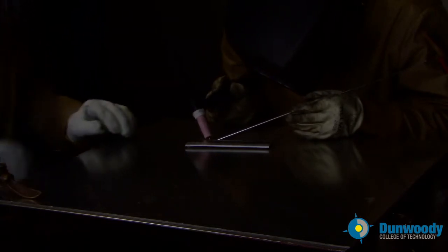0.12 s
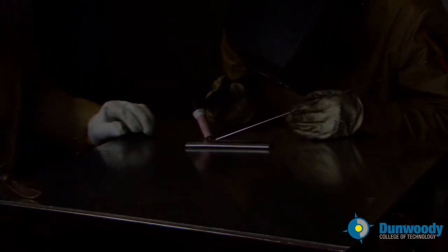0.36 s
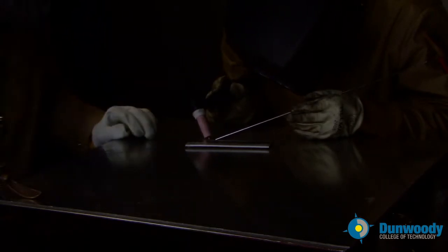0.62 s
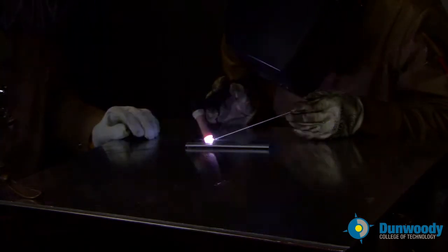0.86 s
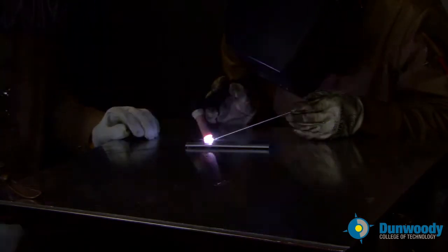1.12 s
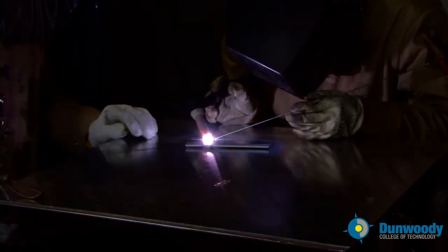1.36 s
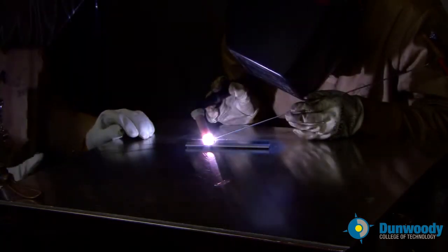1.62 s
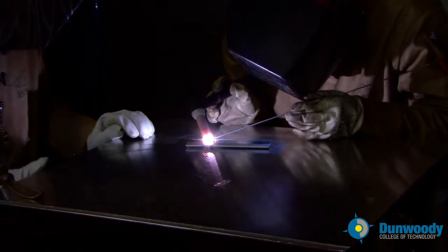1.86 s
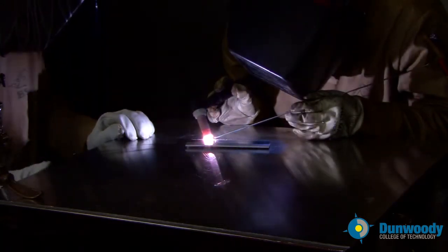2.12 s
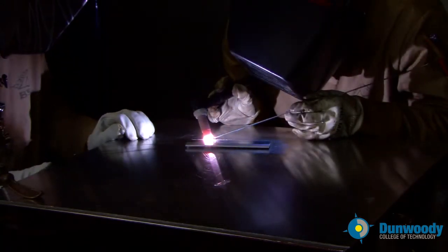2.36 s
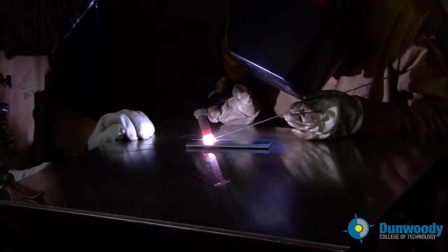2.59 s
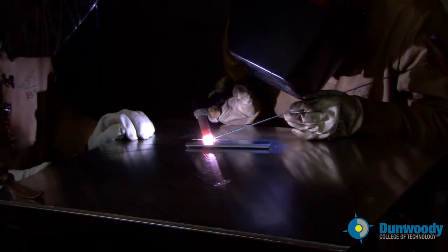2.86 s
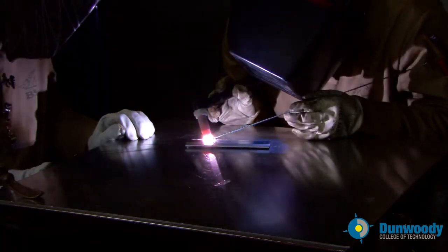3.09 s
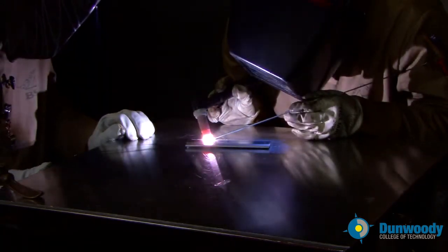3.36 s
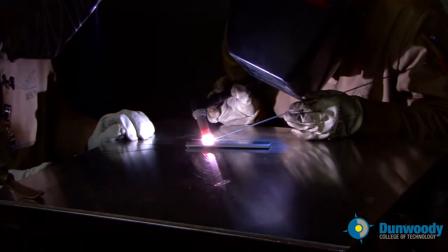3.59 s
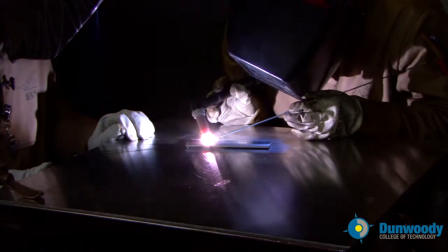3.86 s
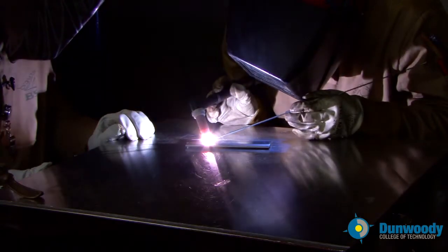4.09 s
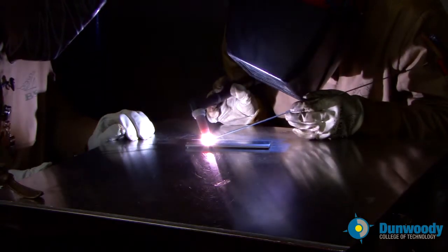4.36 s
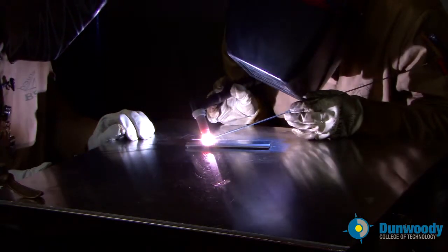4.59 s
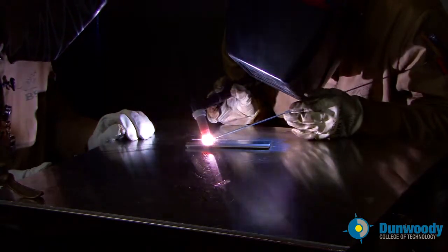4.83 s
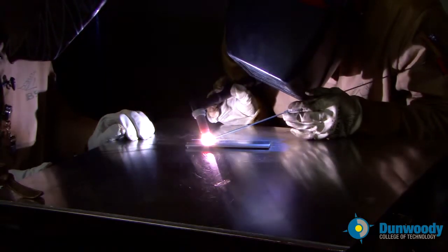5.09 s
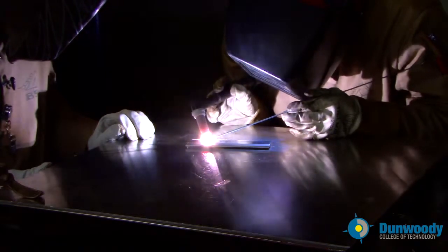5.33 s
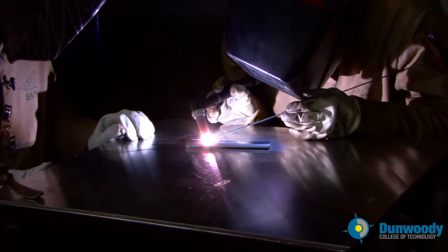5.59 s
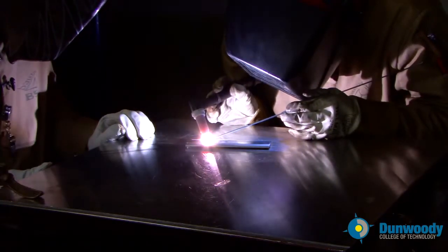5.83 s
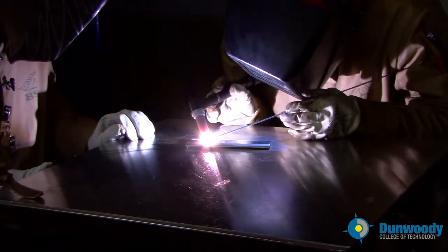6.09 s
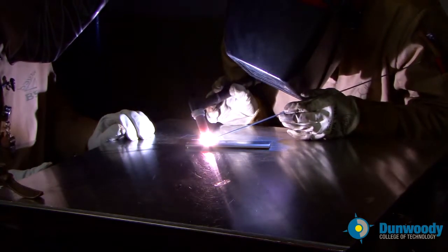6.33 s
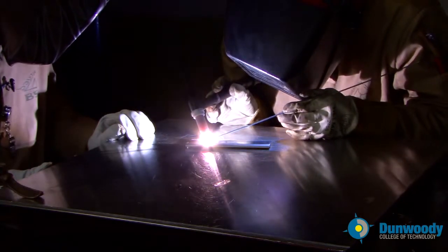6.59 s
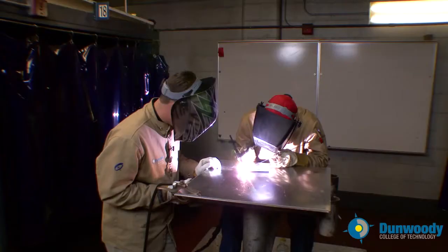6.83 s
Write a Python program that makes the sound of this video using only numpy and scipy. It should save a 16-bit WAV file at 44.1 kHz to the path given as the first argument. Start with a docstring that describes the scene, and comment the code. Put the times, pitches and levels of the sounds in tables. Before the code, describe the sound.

A faint valve click and a rush of shielding gas, then a welding arc snaps alight and holds a loud, harsh, steady buzz with sizzling hiss.

```python
"""A valve clicks over quiet ventilation and shielding gas rushes from a torch cup; then an arc is struck.
This is an alternating-current welding arc on an aluminium plate, heard close by in a quiet workshop.
The buzz is periodic: each cycle repeats a burst of snaps, a harmonic series coloured by resonances.
Around it the fizz is noise pulsed once a cycle, and drops of metal spit single pressure pulses.
The gas is jet noise filtered by the cup; behind it lie broadband air noise and a fan's wavering tone."""
import sys
import numpy as np
from scipy import signal
from scipy.fft import rfft, irfft
from scipy.io import wavfile
from scipy.ndimage import uniform_filter1d, map_coordinates

SR = 44100
rng = np.random.default_rng(int(sys.argv[2]) if len(sys.argv) > 2 else 0)


def store_wav(level_fs):
    """Save 16-bit WAV to argv[1]."""
    pcm = np.round(np.clip(np.atleast_2d(level_fs), -1, 1) * 32767)
    wavfile.write(sys.argv[1], SR, pcm.T.astype(np.int16))


def linear_from_db(decibels):
    """Turn decibels (scalar or array-like) into linear amplitude factors; 0 gives 1."""
    return 10 ** (np.asarray(decibels, float) / 20)


N = 306495
T = np.arange(N) / SR
CYCLE_HZ, FIRST_CYCLE_S, STRIKE_S = 135.145, .7008, .7265
EDGE_HZ = 15720  # upper edge of the whole sound

# Course of the arc: (time [s], buzz level [dB], fizz level over the buzz [dB],
# hum control [about 0-1.2; the hum is weakest near 0.33])
ARC_COURSE = [(.727, -41.5, 21, .3), (.755, -36, 15.5, 0.17), (.79, -22, 3, 0.3), (.88, -18.5, -4.5, 0.092),
              (1.2, -18.5, -5.5, 0), (1.4, -17.5, -10, 0.13), (1.85, -17, -11, 0.017),
              (2.1, -17.5, -11.5, 0.2), (2.45, -18.5, -9.5, 0.34), (2.85, -22.5, -2.5, 0.61),
              (3.62, -23, 0, 0.65), (3.75, -20.5, -7, 0.58), (4.05, -22.5, -2, 1.07),
              (4.4, -20.5, -3, 0.76), (4.7, -19, -3, 0.85), (4.78, -21.5, -6, 0.88),
              (4.85, -22, -1.5, 0.93), (4.91, -27, 2, 1.16), (5.0, -22.5, -0.5, 1.1),
              (6.6, -21, -2.5, 0.92), (6.93, -20.5, -5, 1.17)]
# Progress of the weld: (time [s], stage [0 cold - 1 oxide clearing - 2 melting - 3 pool
# - 4 wide pool - 5 travelling])
WELD_STAGES = [(.9, .38), (1.2, .47), (1.42, 1.09), (1.93, 1.97), (1.96, 2.37), (2.45, 2.83), (2.85, 3.44),
               (4.2, 3.96), (4.72, 4.24), (4.85, 4.29), (5.3, 4.56), (6.9, 5)]


def buzz(turns):
    """Periodicity: every cycle replays the burst of its stage, which slowly changes as the arc roams."""
    hum_null, hum_slope_db, hum_least_db = 0.33, -4.5, -22.5  # weakest control, dB per unit of it, floor
    cycles, count = int(turns[-1]) + 2, int(EDGE_HZ / CYCLE_HZ)
    starts = FIRST_CYCLE_S + np.arange(cycles) / CYCLE_HZ
    buzz_db, _, hum_control = curves(ARC_COURSE, starts)
    hum = np.hypot(linear_from_db(hum_slope_db) * (hum_control - hum_null), linear_from_db(hum_least_db))
    stage = curves(WELD_STAGES, starts)[0]
    frozen = bursts(count)
    share = np.clip(1 - abs(stage[:, None] - np.arange(6)), 0, 1)
    size = order_levels(stage, count)
    mixed = share @ frozen
    roam = orders(flare(stage) * drift((cycles, 1024), size=60), count)
    # strong rings hold still, weak orders swell and cancel
    nearby = uniform_filter1d(size ** 2, size=7, axis=1)
    unrest = np.clip(.12 * nearby / size ** 2, .03, .6)
    z = size * (np.sqrt(1 - unrest) * mixed / abs(mixed) + np.sqrt(unrest) * roam)
    # orders 1-5 are the hum, the rest carry the buzz level; each group is evened over 40 cycles
    for group, gain in ((z[:, :5], hum), (z[:, 5:], 1)):
        power = uniform_filter1d((abs(group) ** 2).sum(1), size=40)
        group *= (gain * linear_from_db(buzz_db) / np.sqrt(power))[:, None]
    shapes = irfft(np.pad(z, ((0, 0), (1, 0))), 2048) * 2048 / np.sqrt(2)
    place = [np.clip(turns, 0, None), turns % 1 * 2048]  # cycle number, point within the cycle
    return map_coordinates(shapes, place, order=1, mode="grid-wrap")


def bursts(count):
    """Phase alignment: one frozen burst a stage, its phases chosen to gather the orders under the flare."""
    bass_lead_ms, bass_sharpness, treble_sharpness = .35, 1.6, .65
    stages = np.arange(6)
    outline = flare(stages)
    seeds = rng.standard_normal((4, 1024))[np.minimum(stages, 3)]  # stages 3-5 share one
    z = orders(outline * seeds, count)
    levels = order_levels(stages, count)
    rounded = uniform_filter1d(outline, size=96, mode="wrap")
    # the bass swells earlier and in one lump, the treble spreads out
    lead = round(bass_lead_ms * CYCLE_HZ * 1024 / 1000)
    lump = np.roll(rounded ** bass_sharpness, -lead, axis=1)
    bands = np.array_split(np.arange(count), [14, 40])  # bass, middle, treble
    swells = (lump, rounded, rounded ** treble_sharpness)
    for _ in range(12):
        for band, swell in zip(bands, swells):
            part = np.zeros((6, 513), complex)
            part[:, band + 1] = (levels * z / abs(z))[:, band]
            shape = irfft(part)
            loud = np.sqrt(uniform_filter1d(shape ** 2, size=96, mode="wrap") + 1e-20)
            squashed = np.tanh(shape / loud)  # no single spike stands out
            z[:, band] = orders(squashed * swell, count)[:, band]
    return levels * z / abs(z)


# Snaps inside a cycle, two polarity flips and their echoes off bench and helmet:
# (time in the cycle [ms], level when cold [dB], level over the pool [dB])
CYCLE_SNAPS = [(.1, -4, -4), (1., -1, -6), (2.35, -1, 0), (3., -1, -2), (3.6, -1, -2), (4.2, -4, -6),
               (5.2, -8, -10), (6.6, -11, -11)]


def flare(stage, ring_ms=.5):
    """Exponential decay: loudness along one cycle leaps at each snap and dies at once."""
    ms = np.arange(1024) / 1024 * 1000 / CYCLE_HZ
    at, cold_db, pool_db = np.transpose(CYCLE_SNAPS)
    since = (ms[:, None] - at) % (1000 / CYCLE_HZ)
    db = cold_db + (pool_db - cold_db) * np.clip(stage[:, None] / 3, 0, 1)
    return linear_from_db(db) @ np.exp(-since / ring_ms).T


# What each flip rings in, cup, plate and bench; each ring is loudest at one weld stage:
# (frequency [Hz], width [Hz], top level [dB], stage of the top [may lie just outside 0-5],
# fall [dB per stage], glide [Hz per stage])
FLIP_RINGS = [(320.0, 90.0, -13.5, 4.5, 5.5, 20.0), (450.0, 150.0, -5.0, 4.5, 8.0, 10.0),
              (620.0, 100.0, -9.5, 2.5, 5.5, 0.0), (1080.0, 190.0, -19.5, 1.4, 6.5, -20.0),
              (1280.0, 120.0, -21.0, 4.6, 7.0, 0.0), (1810.0, 500.0, -26.5, 2.0, 4.0, -40.0),
              (2360.0, 90.0, -12.5, -0.3, 3.5, 10.0), (2890.0, 120.0, -19.0, 2.6, 3.5, 30.0),
              (3110.0, 140.0, -16.5, 2.3, 3.5, 20.0), (3640.0, 320.0, -23.0, 1.2, 2.5, 40.0),
              (4130.0, 120.0, -12.5, 1.7, 10.5, 30.0), (4390.0, 1660.0, -24.0, 5.2, 22.0, 400.0),
              (4470.0, 210.0, -22.5, 1.7, 4.5, 10.0), (4990.0, 180.0, -19.5, 1.4, 5.5, 50.0),
              (5550.0, 200.0, -22.0, 1.3, 8.5, -60.0), (5890.0, 120.0, -17.5, 1.4, 3.0, 0.0),
              (6400.0, 390.0, -21.5, 2.0, 4.0, -10.0), (6810.0, 130.0, -23.0, 2.6, 5.5, 20.0),
              (7110.0, 110.0, -16.5, 1.5, 9.5, -10.0), (7970.0, 1960.0, -30.5, 0.4, 7.0, 400.0),
              (8590.0, 210.0, -19.5, 5.4, 14.0, -20.0), (9040.0, 150.0, -17.5, 2.0, 16.5, 80.0),
              (10280.0, 170.0, -14.5, 1.5, 19.5, -100.0), (10440.0, 210.0, -19.0, 2.9, 7.5, -30.0),
              (10760.0, 100.0, -13.0, 0.4, 22.0, -110.0), (11220.0, 1680.0, -29.0, 3.0, 3.5, 390.0),
              (11800.0, 110.0, -18.0, 2.6, 5.0, 0.0), (12130.0, 140.0, -15.5, 1.6, 10.0, 130.0),
              (12560.0, 90.0, -20.0, 1.9, 8.0, 100.0), (12760.0, 140.0, -10.0, 2.6, 22.0, 30.0),
              (13010.0, 160.0, -20.5, 2.2, 7.0, 40.0), (13440.0, 1200.0, -21.0, 4.8, 22.0, 400.0),
              (13460.0, 150.0, -22.0, 2.3, 8.0, 60.0), (13880.0, 90.0, -16.0, 1.5, 9.0, -10.0),
              (14110.0, 100.0, -9.0, 2.6, 17.0, 0.0), (14580.0, 510.0, -23.5, 2.1, 7.5, 50.0),
              (15350.0, 480.0, -23.5, 1.5, 11.5, 30.0)]


def order_levels(stage, count):
    """Resonance and comb filtering: rings colour the orders, a snap and a weaker second one comb them."""
    second_flip, balance = 0.23, .3  # second flip relative to the first, share of the cycle between
    between_db, thin_hz, dull_hz = -37, 227, 15500  # level between rings, lower fade, upper fade
    k = np.arange(1, count + 1)
    f, width, top_db, best, fall_db, glide = np.transpose(FLIP_RINGS)[:, :, None, None]
    hz, away = CYCLE_HZ * k, stage[:, None] - best
    ring_db = top_db - fall_db * np.hypot(away, .3)
    centre = f + glide * away  # glides as the arc gap changes
    power = (linear_from_db(ring_db) ** 2 / (1 + (2 * (hz - centre) / width) ** 4)).sum(0)
    between = linear_from_db(between_db) ** 2 / (1 + (thin_hz / hz) ** 8)
    dull = 1 + (hz / dull_hz) ** 40
    comb = abs(1 + second_flip * np.exp(2j * np.pi * k * balance))
    return np.sqrt((power + between) / dull) * comb


def orders(shapes, count):
    """Fourier series: the harmonics of each cycle shape, scaled to unit mean power."""
    z = rfft(shapes)[:, 1:count + 1]
    return z / np.sqrt(np.mean(abs(z) ** 2, 1, keepdims=True))


# Colour of the fizz: (frequency [Hz], relative density [dB per Hz])
FIZZ_COLOUR = [(135, -8), (270, -3), (541, 0), (1081, 0), (1892, -2.5), (3108, -4), (4500, -4), (5200, -4),
               (6100, -3.5), (7400, -6.5), (10001, -2.5), (10541, 1.5), (13920, 0), (15136, -6),
               (15677, -19.5)]
# Fizz inside a cycle: (time in the cycle [ms], relative level [dB])
FIZZ_PUFF = [(0, -13), (.45, -3), (1.9, 0), (3.1, -2.5), (4.2, -8), (5.3, -14), (7.4, -16)]
# Sizzle by weld stage: (stage [0-5], gain over 9.5 kHz [dB], further gain over 12.8 kHz [dB])
FIZZ_SIZZLE = [(.4, 0.5, -2), (1.5, 3.5, -6), (2.5, -0.5, 6), (3.6, 1.5, 0), (4.3, -2, 2.5), (4.6, 0.5, 3),
               (5, -1.5, 4.5)]


def fizz(turns):
    """Amplitude-modulated noise: fresh noise and dull sparks, puffed each cycle once the arc has locked."""
    sparks_per_s = 1400
    hollow_hz, sink_hz_per_stage, lowest_hz = 10900, 1600, 8900  # upper edge of a hollow band
    hollow_share, hollow_depth = .86, .35  # lower edge over upper edge, share removed
    (buzz_db, over_db, hum_control), stage = curves(ARC_COURSE, T), curves(WELD_STAGES, T)[0]
    locked = np.clip((T - .765) / 0.055, 0, 1)  # 0 at the strike, 1 under the square wave

    ms, db = np.transpose(FIZZ_PUFF)
    puff = evened(linear_from_db(np.interp(turns % 1 * 1000 / CYCLE_HZ, ms, db))) ** locked
    cycle_db = .8 * np.clip(rng.standard_normal(int(turns[-1]) + 2), -2, 2)
    puff *= linear_from_db(cycle_db)[np.maximum(turns, 0).astype(int)]

    strength = np.minimum(abs(rng.standard_normal(N)), 2)
    strength = strength * linear_from_db(2.1 * np.minimum(rng.exponential(1, N), 2.5))
    sparks = -strength * (rng.random(N) < sparks_per_s / SR)
    dull = coloured(sparks - sparks.mean(), lambda hz: hz / (hz + 350) / (1 + (hz / 3500) ** 4))
    spark_share = 0.28 - 0.01 * hum_control  # about the same throughout
    grains = spark_share * locked * evened(dull * np.sqrt(puff))
    raw = (rng.standard_normal(N) + grains) * puff
    sound = coloured(raw, lambda hz: linear_from_db(read(FIZZ_COLOUR, hz)[0]))
    top = coloured(sound, lambda hz: 1 / (1 + (9500 / (hz + 1)) ** 12))
    tip = coloured(sound, lambda hz: 1 / (1 + (12800 / (hz + 1)) ** 16))

    def upper_hz(t):  # sinks as the arc settles
        return np.maximum(hollow_hz - sink_hz_per_stage * curves(WELD_STAGES, t)[0], lowest_hz)

    hollow = above(sound, lambda t: hollow_share * upper_hz(t), steepness=20)
    hollow = hollow - above(sound, upper_hz, steepness=20)
    unfilled = np.clip(3.8 - stage, 0, 1)  # the hollow fills in once the pool forms
    sound = sound - hollow_depth * locked * unfilled * hollow

    top_db, tip_db = curves(FIZZ_SIZZLE, stage)
    top_db = 2.3 * (1 - locked) + locked * top_db  # shrill at the strike
    sound = sound + (linear_from_db(top_db) - 1) * top + linear_from_db(top_db) * (linear_from_db(locked * tip_db) - 1) * tip
    return linear_from_db(buzz_db + over_db) * evened(sound)


# Loudest spits of the pool: (time [s], peak level before the arc's waver [dB])
POOL_SPITS = [(4.4994, -9), (5.832, -6), (6.0237, -9)]


def spits(width_ms=0.076):
    """Impulsive source: a drop of metal bursts in one short suction pulse."""
    out = np.zeros(N)
    for s, db in POOL_SPITS:
        u = (T - s) * 1000 / width_ms
        out -= linear_from_db(db) * (1 - 0.32 * u ** 2) * np.exp(-np.minimum(u ** 2 / 4, 50))
    return out


def arc():
    """Superposition: buzz, fizz and spits from the strike on; heat shimmer scatters each snap's arrival."""
    turns = (T - FIRST_CYCLE_S) * CYCLE_HZ
    stage = curves(WELD_STAGES, T)[0]
    scatter_us = 1.3 + 1.1 * np.clip(stage - 1.7, 0, 1.8)  # rms, grows once the metal melts
    scatter_s = scatter_us / 10 ** 6 * drift(N, size=50)
    lit = np.clip((T - STRIKE_S) / 0.00072, 0, 1)
    waver = linear_from_db(.55 * drift(N, size=2500))  # dB rms; the arc length wanders a few times a second
    return lit * waver * (buzz(turns + scatter_s * CYCLE_HZ) + fizz(turns) + spits())


GAS_OPENS_S = 0.22
# Colour of the jet noise: (frequency [Hz], relative density [dB per Hz])
JET_COLOUR = [(60, -32), (400, -19), (1600, -14.5), (2700, -11), (5000, -20), (9000, -10.5), (15900, -6)]
# Air resonances of the gas cup: (frequency [Hz], width [Hz], level over the jet noise [dB])
CUP_RINGS = [(3100, 310, 14.5), (3700, 300, 16.5), (4380, 370, 13), (5700, 920, 11), (6730, 370, 10),
             (7650, 240, 10.5), (8060, 540, 8), (9900, 500, 2), (12100, 720, 8), (15200, 900, 5)]


def gas():
    """Jet noise in a resonator: turbulence rings in the cup; rumble and top whistle fade with the surge."""
    rise_s = 0.051
    whistle_hz, whistle_rise_hz_per_s = 12200, 6500  # the top whistle narrows upward
    dip_share, dip_depth = 0.86, 0.55  # hollow under the whistle: lower over upper edge, share removed

    def cup(hz):
        rings = sum(linear_from_db(db) ** 2 / (1 + (2 * (hz - f) / w) ** 4) for f, w, db in CUP_RINGS)
        return linear_from_db(read(JET_COLOUR, hz)[0]) * np.sqrt(1 + rings)

    def edge_hz(t):
        return np.clip(whistle_hz + whistle_rise_hz_per_s * (t - GAS_OPENS_S), 0, EDGE_HZ)

    jet = evened(coloured(rng.standard_normal(N), cup))
    low = coloured(jet, lambda hz: 1 / (1 + (hz / 1500) ** 4))
    top = above(jet, edge_hz, steepness=30)
    dip = above(jet, lambda t: dip_share * edge_hz(t), steepness=30) - top
    jet = jet - dip_depth * dip
    opening = (1 - np.exp(-np.maximum(T - GAS_OPENS_S, 0) / rise_s)) ** 1.63
    flow = opening * surge(start_db=-22.5, fade_db_per_s=14.5, settled_db=-30.5)
    rumble = surge(start_db=9.9, fade_db_per_s=29, settled_db=-4)
    whistle = surge(start_db=4.7, fade_db_per_s=15, settled_db=1.5)
    flutter = linear_from_db(0.67 * drift(N, size=200))
    return flutter * flow * (jet + (rumble - 1) * low + (whistle - 1) * top)


def surge(start_db, fade_db_per_s, settled_db):
    """Pressure relief: a level that sinks steadily after the gas opens, down to its settled value."""
    return linear_from_db(np.maximum(start_db - fade_db_per_s * (T - GAS_OPENS_S), settled_db))


# Click of the valve: (time [s], peak level of its ring [dB])
VALVE_CLICK = [(0.173, -44)]
# Ring of the valve: (frequency [Hz], relative level [dB], time to fall 60 dB [s])
VALVE_RING = [(3600, 0, 0.021)]


def valve():
    """Impact excitation: the solenoid plunger clicks with a puff of noise and a short metal ring."""
    (s, peak_db), = VALVE_CLICK
    t = np.maximum(T - s, 0)
    ring = np.zeros(N)
    for hz, db, t60 in VALVE_RING:
        ring += linear_from_db(db - 60 * np.minimum(t / t60, 3)) * np.sin(2 * np.pi * hz * t)
    bright = coloured(rng.standard_normal(N), lambda hz: 1 / (1 + (3000 / (hz + 1)) ** 6))
    crack = bright * np.exp(-t / 0.0088)
    return linear_from_db(peak_db) * (T > s) * (ring / abs(ring).max() + crack)


# Colour of the ventilation: (frequency [Hz], relative density [dB per Hz])
AIR_COLOUR = [(24, -56), (40, -14), (411, -11), (465, -10.5), (13000, -32.5), (15900, -42)]
# Whine of the welder's fan: (mean frequency [Hz], middle level [dB])
FAN_WHINE = [(414.5, -63)]


def shop():
    """Broadband noise and a frequency-modulated tone: ventilation and the wavering whine of a fan."""
    hiss = coloured(rng.standard_normal(N), lambda hz: linear_from_db(read(AIR_COLOUR, hz)[0]))
    air = linear_from_db(-55.5) * evened(hiss)
    (hz, db), = FAN_WHINE
    whine_hz = hz * (1 + 0.013 * drift(N, size=1500))
    whine = np.sin(2 * np.pi * np.cumsum(whine_hz) / SR)
    return air + linear_from_db(db + 2 * drift(N, size=1000)) * np.sqrt(2) * whine


def evened(x):
    """Normalisation: scales to an rms of one."""
    return x / np.sqrt(np.mean(abs(x) ** 2) + 1e-20)


def read(points, hz):
    """Logarithmic pitch scale: reads a spectrum between its points."""
    f, *values = np.transpose(points)
    return np.array([np.interp(np.log(hz + 1), np.log(f + 1), v) for v in values])


def curves(rows, t):
    """Linear interpolation: each column of a table against its first."""
    s, *columns = np.transpose(rows)
    return [np.interp(t, s, c) for c in columns]


def coloured(x, gain):
    """Linear filtering: multiplies the spectrum by gain(Hz)."""
    return irfft(rfft(x) * gain(np.fft.rfftfreq(len(x), 1 / SR)), len(x))


def drift(shape, size):
    """Low-passed chance: noise averaged twice over size steps of the first axis, at unit rms."""
    smooth = uniform_filter1d(rng.standard_normal(shape), size, 0)
    return evened(uniform_filter1d(smooth, size, 0))


def above(x, edge_hz_of, steepness):
    """Time-varying high-pass: what lies over an edge that moves with time."""
    hz, t, z = signal.stft(x, SR, nperseg=512)
    passed = z / (1 + (edge_hz_of(t) / (hz[:, None] + 1)) ** steepness)
    return signal.istft(passed, SR, nperseg=512)[1][:N]


def scene():
    """Superposition: all sources add at one point, alike in both channels."""
    return np.tile(arc() + gas() + valve() + shop(), (2, 1))


def band_limit(x):
    """A steep low-pass at the top of the band."""
    return signal.sosfilt(signal.butter(12, 16160, fs=SR, output="sos"), x)


def record(dry):
    """Band limitation: a single microphone with a bass cut and an upper band limit."""
    thin = signal.sosfilt(signal.butter(2, 105, "high", fs=SR, output="sos"), dry)
    limit = signal.firwin(1023, EDGE_HZ, window=("kaiser", 9), fs=SR)
    mix = signal.oaconvolve(thin, limit[None], "same")
    return band_limit(mix)


dry = scene()
out = record(dry)
store_wav(out)
```